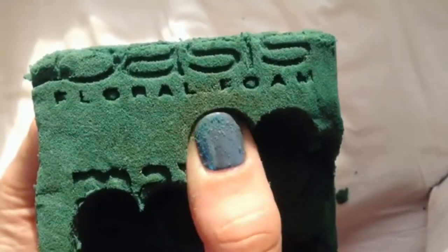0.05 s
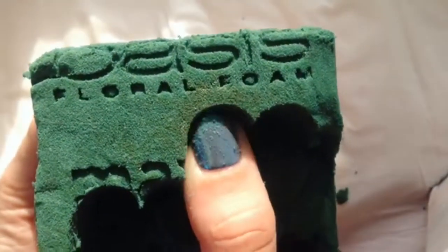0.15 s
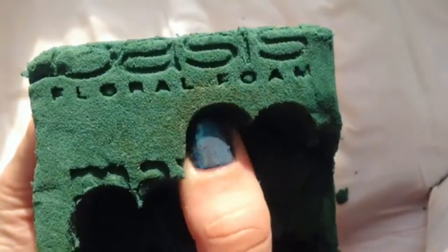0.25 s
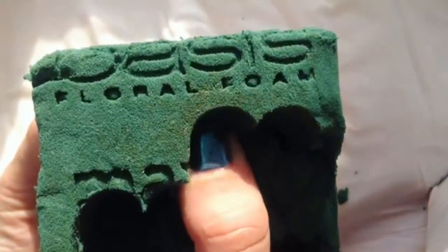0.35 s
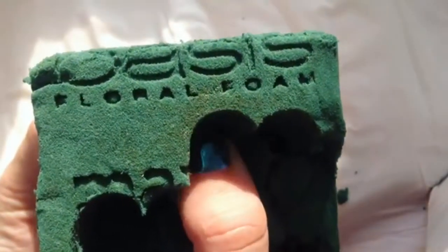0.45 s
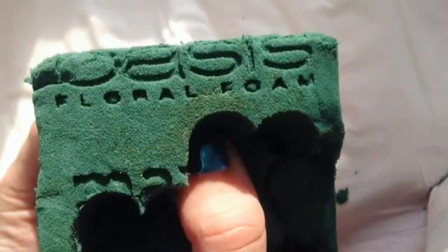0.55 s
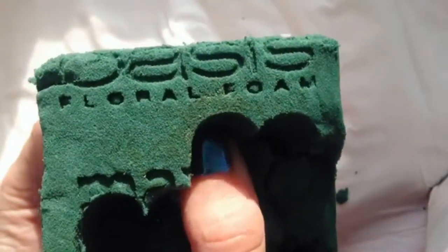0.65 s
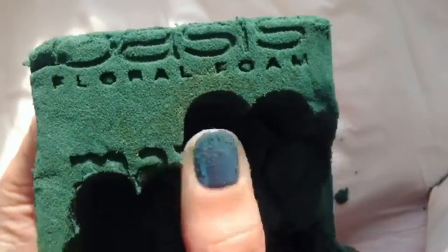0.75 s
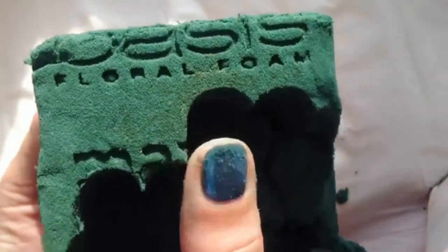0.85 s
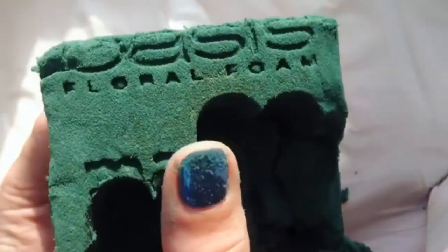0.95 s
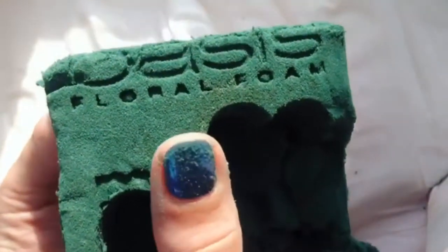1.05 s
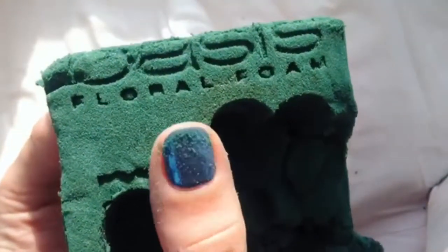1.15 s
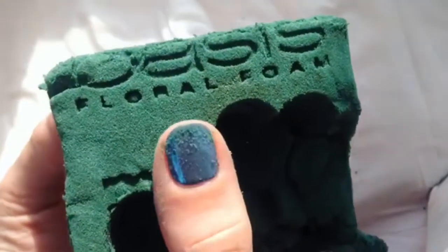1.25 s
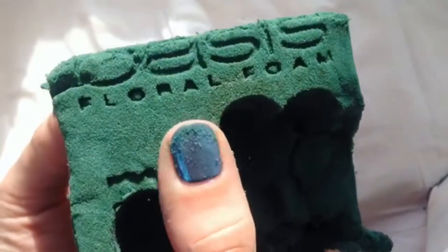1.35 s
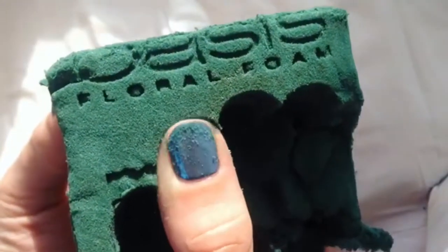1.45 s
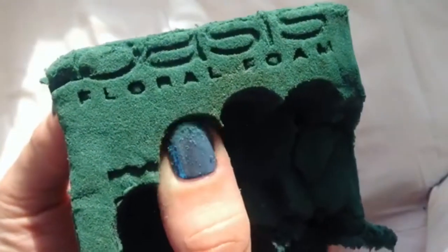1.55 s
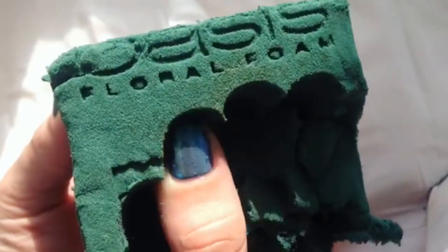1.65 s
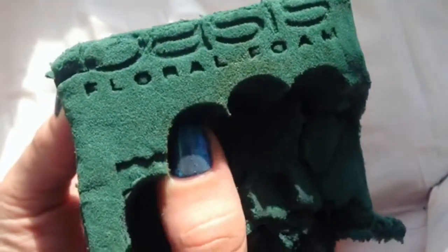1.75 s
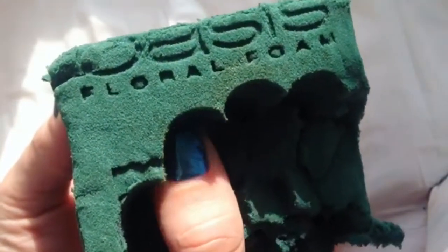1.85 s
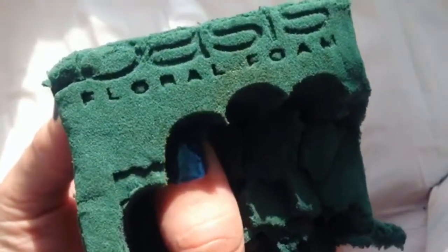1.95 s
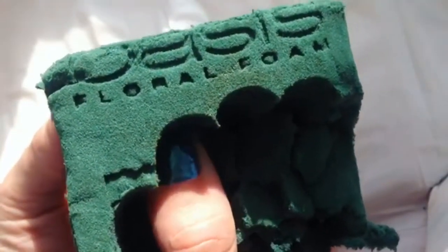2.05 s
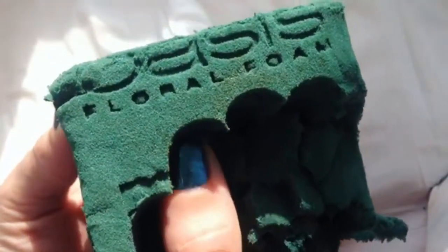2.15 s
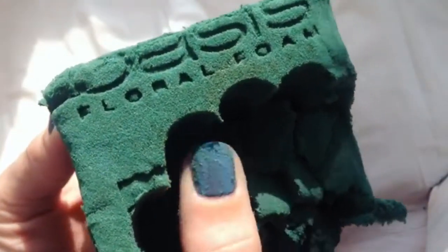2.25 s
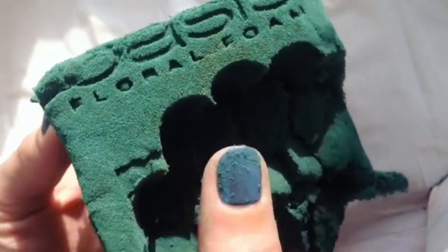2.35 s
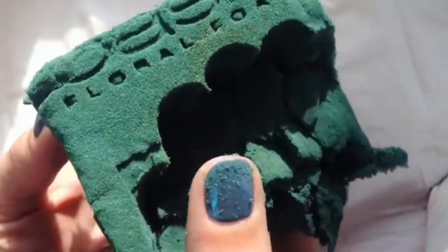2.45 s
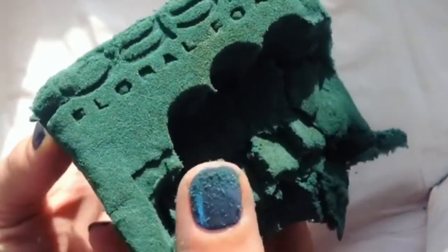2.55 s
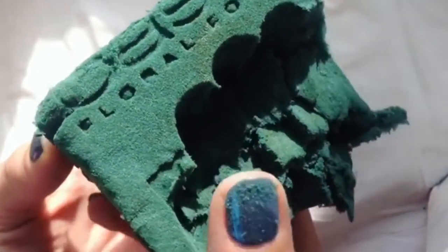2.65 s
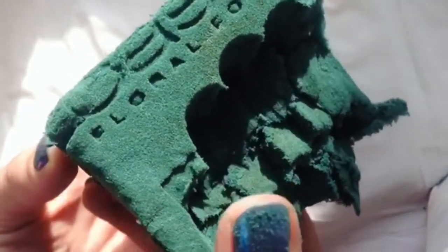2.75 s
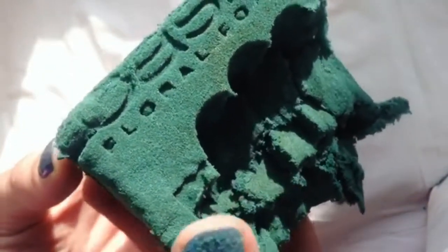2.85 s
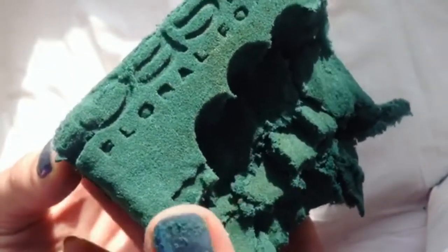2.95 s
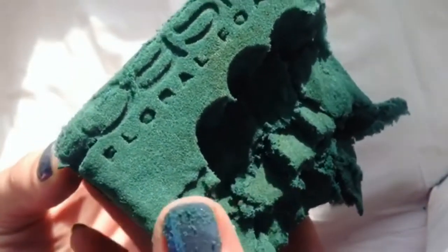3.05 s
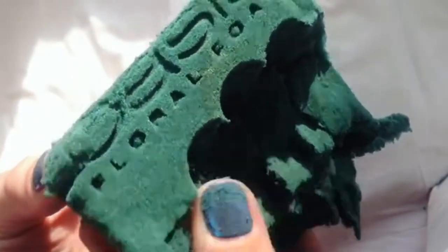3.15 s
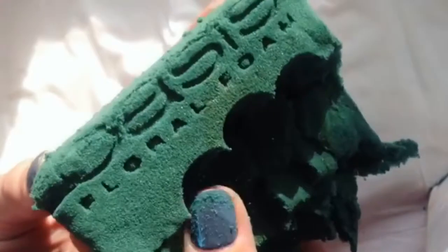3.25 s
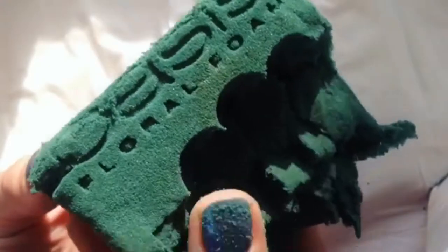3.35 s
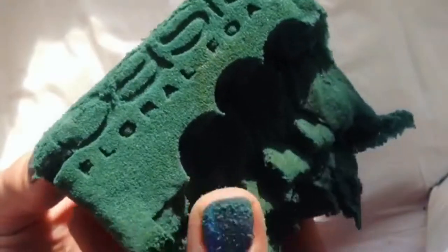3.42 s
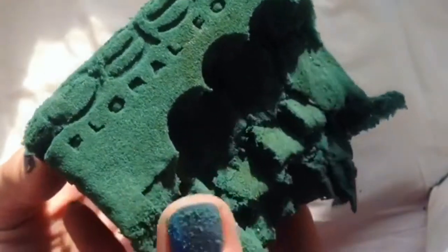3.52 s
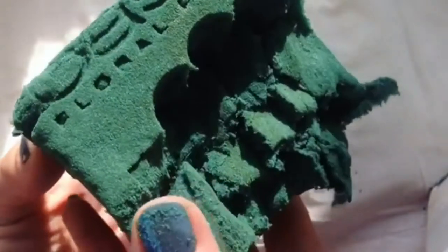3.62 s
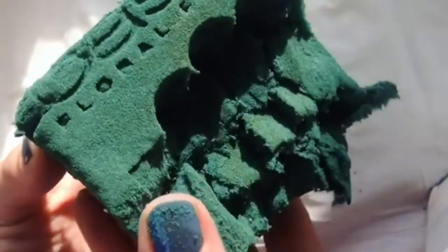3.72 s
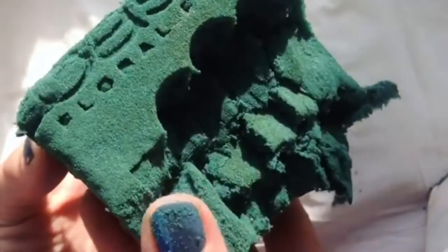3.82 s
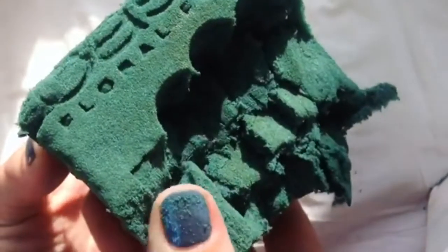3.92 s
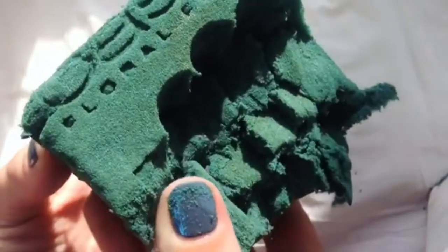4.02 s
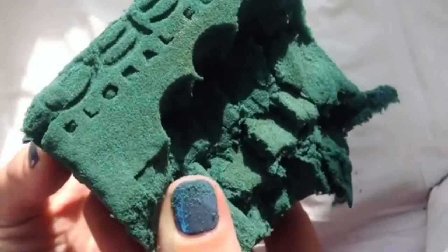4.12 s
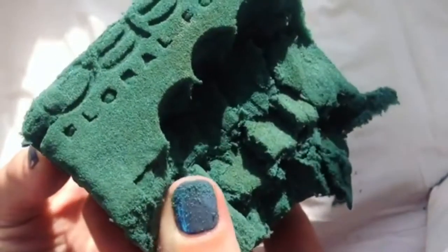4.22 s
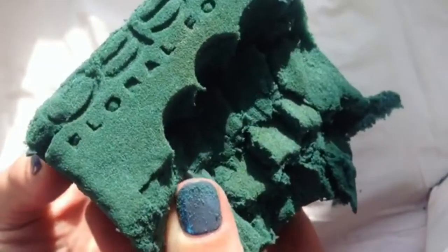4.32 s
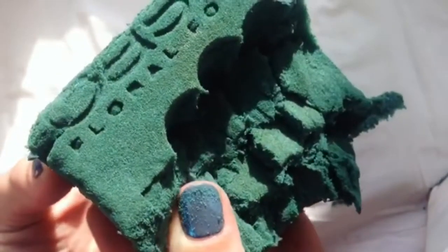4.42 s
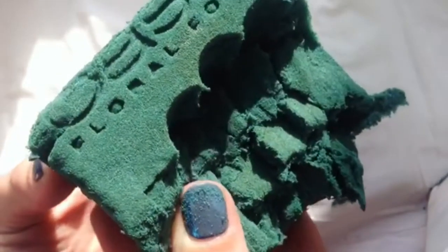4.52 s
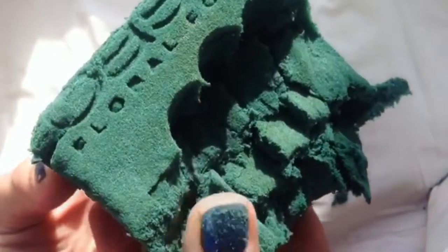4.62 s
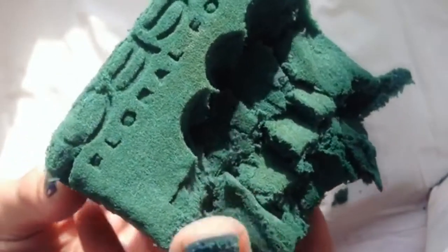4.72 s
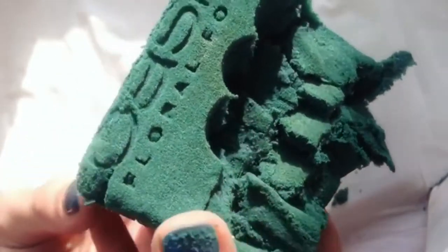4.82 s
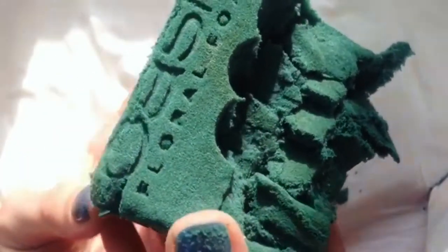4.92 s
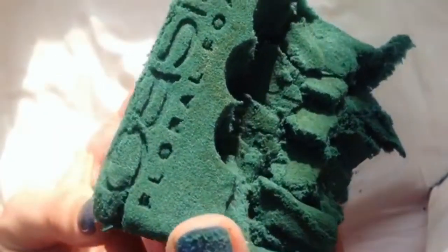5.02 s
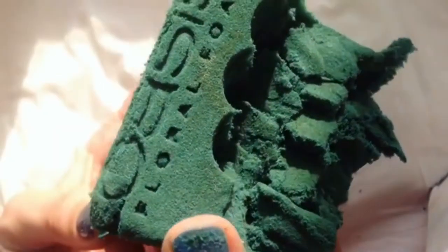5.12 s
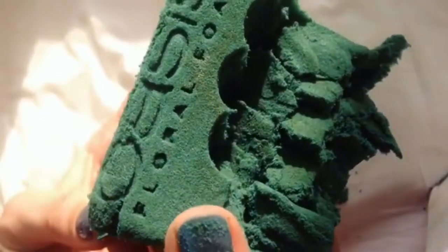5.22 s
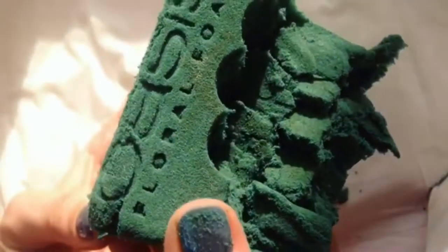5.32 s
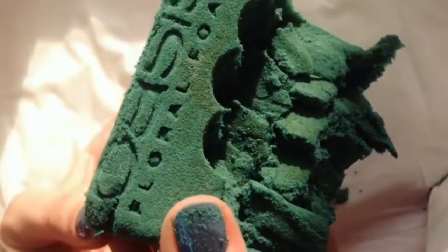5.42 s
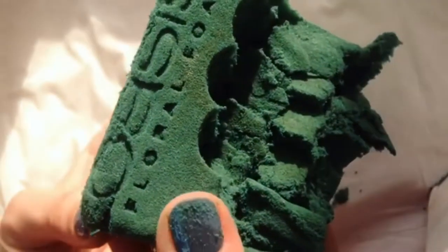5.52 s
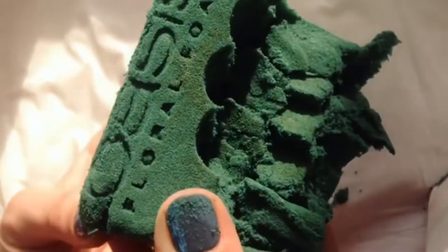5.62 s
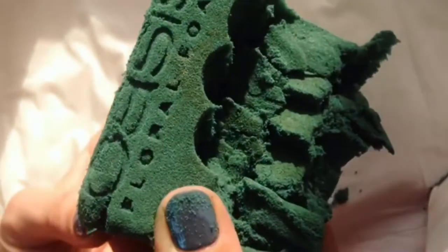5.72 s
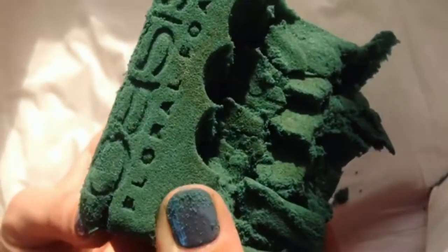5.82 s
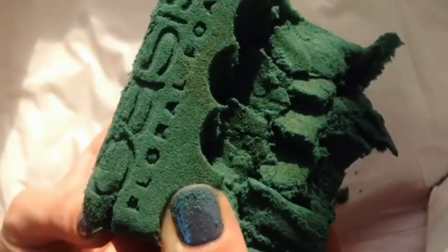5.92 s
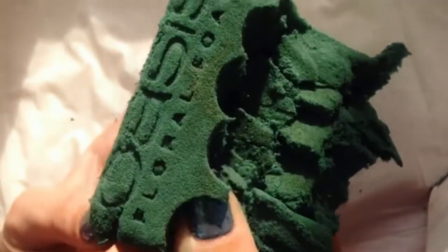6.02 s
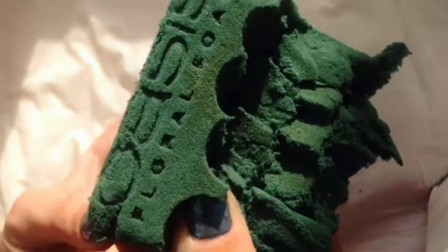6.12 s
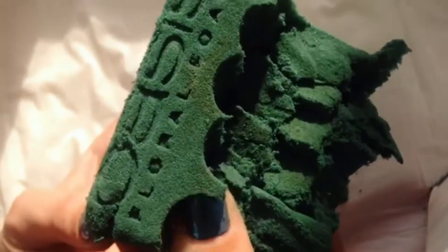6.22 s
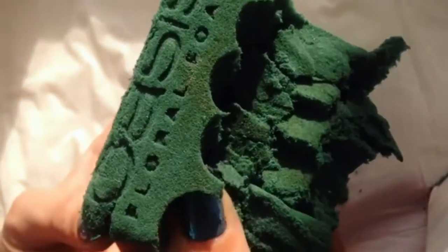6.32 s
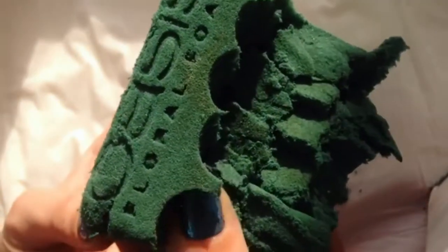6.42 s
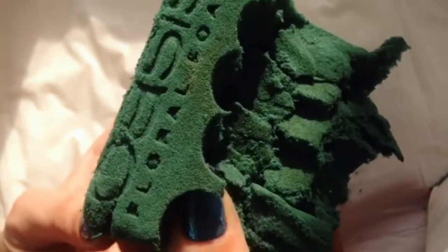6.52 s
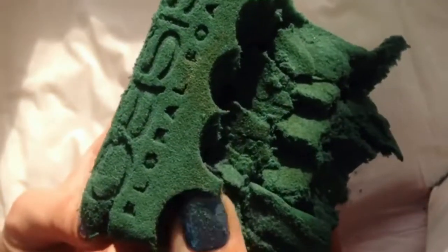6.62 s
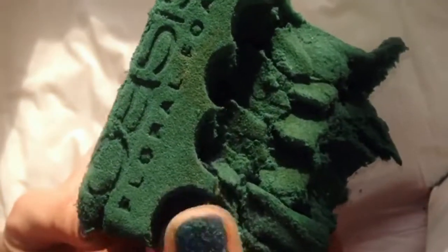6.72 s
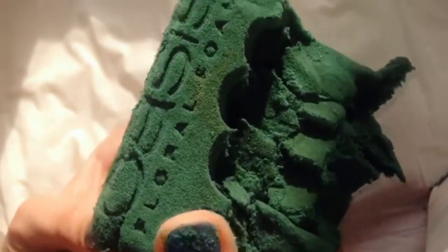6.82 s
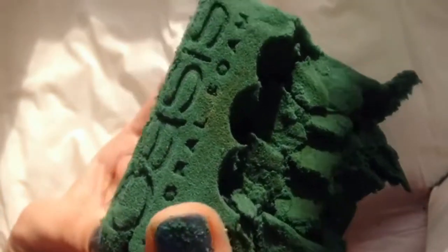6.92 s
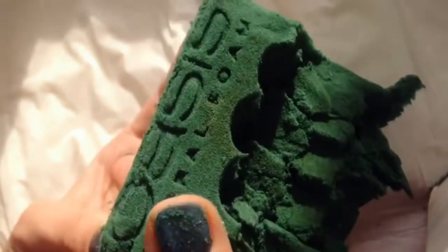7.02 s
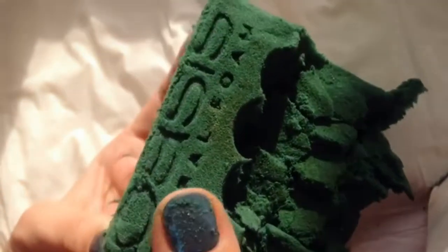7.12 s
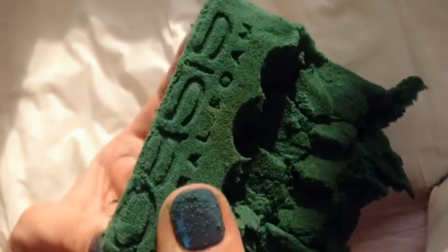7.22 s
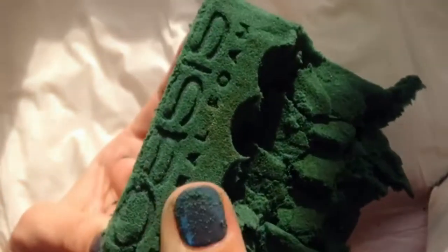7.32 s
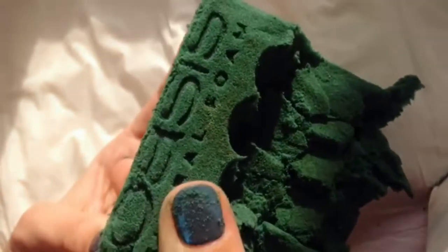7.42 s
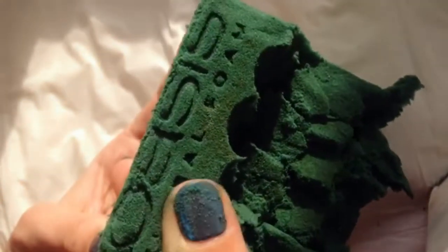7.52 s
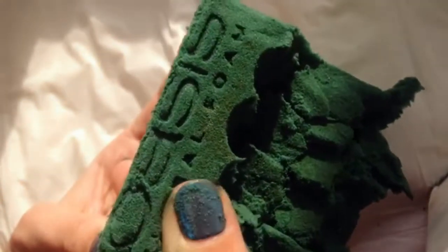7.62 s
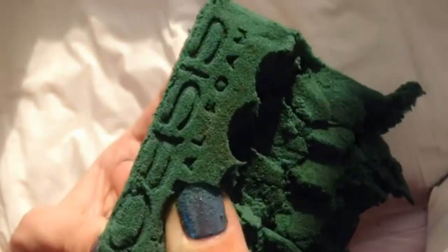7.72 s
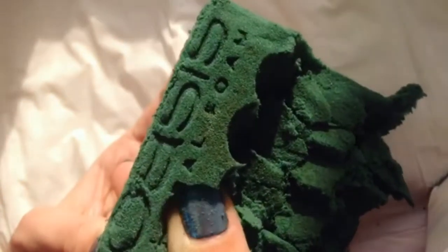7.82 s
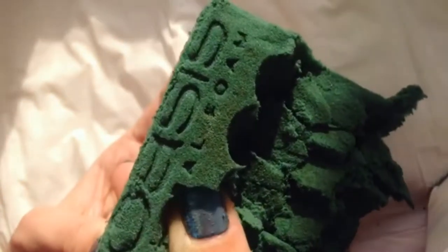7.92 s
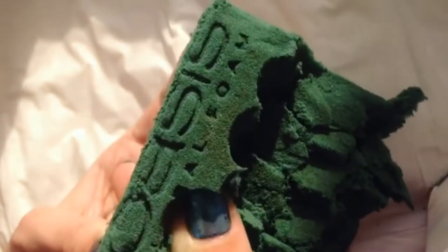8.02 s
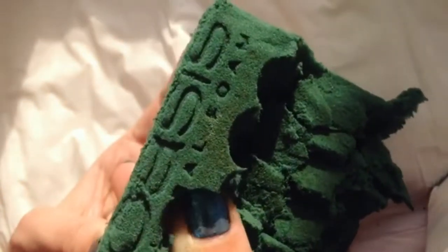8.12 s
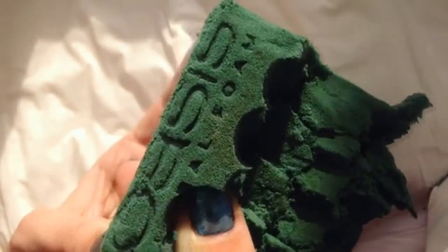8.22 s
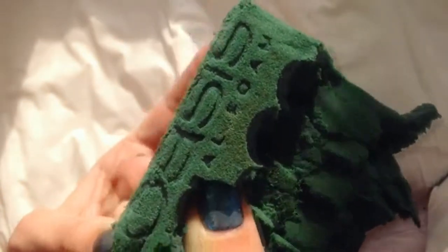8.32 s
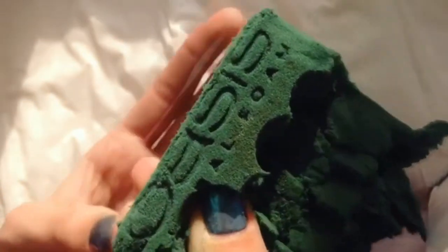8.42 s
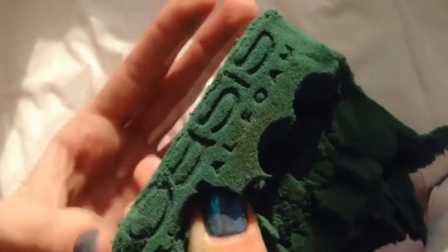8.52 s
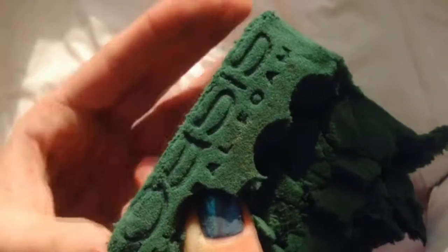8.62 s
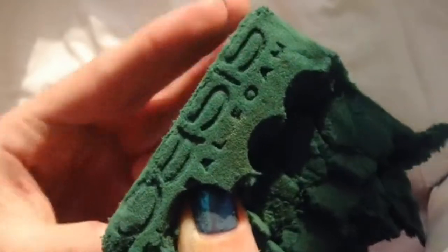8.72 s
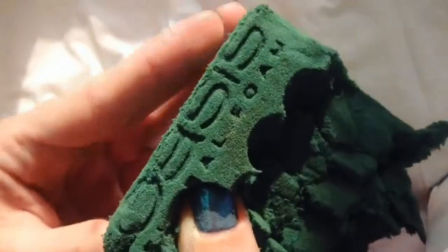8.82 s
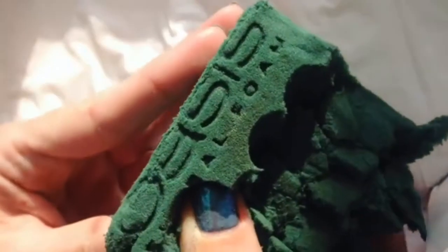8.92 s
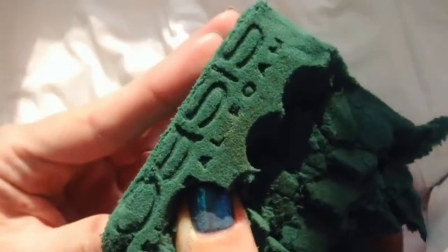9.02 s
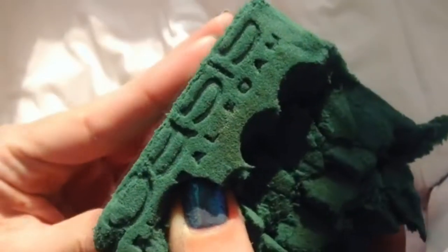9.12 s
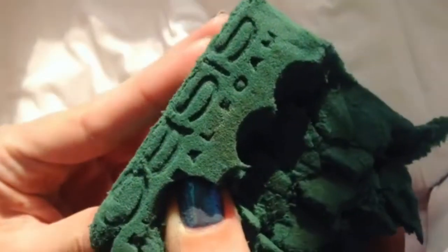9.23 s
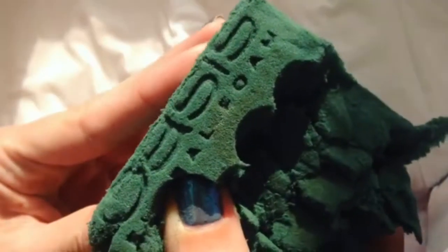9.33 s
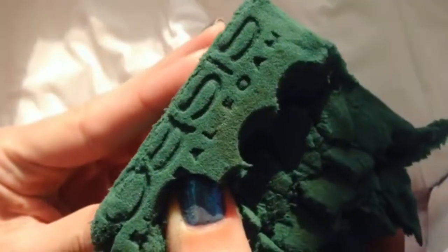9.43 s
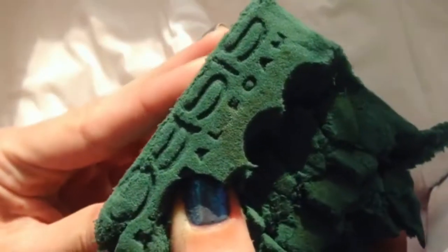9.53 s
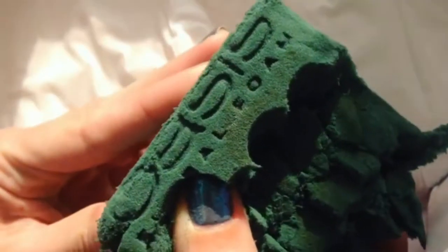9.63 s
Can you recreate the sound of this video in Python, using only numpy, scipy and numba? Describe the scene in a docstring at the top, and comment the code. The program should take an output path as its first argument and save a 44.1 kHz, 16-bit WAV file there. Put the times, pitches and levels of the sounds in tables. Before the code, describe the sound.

A close, dry phone pickup in a quiet room with low rumble, faint hiss and barely audible wavering hum. From 0 to 0.7 s a thumb sinks into brittle foam with a dense, gritty crunch full of tiny snaps. Soft skin brushing follows around 0.9 s, then a second crunch from about 1.4 to 2.15 s. Light rubbing fills the gap until a short, very sharp crack at 3.3 s. A softer crackling press runs from 4.0 to 4.65 s, followed by quiet scraping. From 5.45 to 6.5 s come uneven, brighter crackles with strong hollow snaps, the hardest near 6.17 and 6.47 s. After a near-silent pause, a crisp break at 7.4 s starts scattered crunches until about 8.3 s. Quiet brushing remains, with small faint crackles around 9.4 to 9.65 s.

```python
"""Brittle foam under a thumb

A thumb presses into dry foam held close to a phone in a quiet room. Collapsing cells crackle as patchy
noise bursts through damped modes; larger walls snap as short tears that ring the light block. Skin
brushes the surface between presses, over rumble and hiss of shaped noise and two wavering sine hums."""
import sys
import numpy as np
from scipy import signal
from scipy.fft import rfft, irfft, next_fast_len
from scipy.io import wavfile
from scipy.ndimage import uniform_filter1d
from numba import njit

SR = 44100
rng = np.random.default_rng(int(sys.argv[2]) if len(sys.argv) > 2 else 0)


def int16_out(signal):
    """Quantize to a 16-bit WAV file."""
    q = np.round(np.clip(np.atleast_2d(signal).T, -1, 1) * 32767)
    wavfile.write(sys.argv[1], SR, q.astype(np.int16))


N = 426006

# bright modes shared by crackle and snaps: centre f/Hz, bandwidth/Hz, relative level/dB
FIZZ_MODES = [(7160, 3430, -2), (10070, 2440, -1.5), (11930, 4600, -3)]


def undb(db):
    """Decibel law: the amplitude gain of a level in dB."""
    return 10 ** (np.asarray(db) / 20)


def unit(x):
    """Normalization of mean power: scale to rms 1 along the last axis."""
    return x / np.sqrt(np.mean(x ** 2, axis=-1, keepdims=True))


def curves(table):
    """Linear interpolation: each column after the time becomes one value a sample."""
    s, *columns = np.transpose(table)
    return [np.interp(np.arange(N) / SR, s, column) for column in columns]


def resonance(f, hz, width_hz):
    """Damped oscillator: causal frequency response of one mode, gain 1 at its centre."""
    return 1j * f * width_hz / (hz ** 2 - f ** 2 + 1j * f * width_hz)


def ring(x, modes, order=1):
    """Modal superposition: modes of alternating sign; a higher order darkens the skirts."""
    f = np.fft.rfftfreq(x.shape[-1], 1 / SR)
    response = 0
    for k, (hz, width_hz, db) in enumerate(modes):
        response = response + (-1) ** k * undb(db) * resonance(f, hz, width_hz) ** order
    return irfft(rfft(x) * response, x.shape[-1])


def walk(rate):
    """Slow random modulation: levels held 1 / rate s, smoothed twice, scaled to rms 1."""
    hold = int(SR / rate)
    steps = np.repeat(rng.standard_normal(N // hold + 1), hold)
    return unit(uniform_filter1d(uniform_filter1d(steps, hold), hold)[:N])


def contact():
    """Incoherent sources add in power: crackle, body and fizz levels in dB, and air pocket Hz."""
    # presses, three sustained and one brief sharp crunch, each a contour of the crackle: t/s, level/dB
    presses = [
        [(0.0, -35), (0.036, -45), (0.111, -28), (0.177, -38), (0.336, -32), (0.397, -36), (0.509, -28.5),
         (0.62, -32), (0.682, -42), (0.746, -70)],
        [(1.277, -60), (1.498, -27.5), (1.59, -30), (1.635, -43.5), (1.677, -30), (1.724, -37), (1.859, -30),
         (1.932, -44.5), (1.98, -36), (2.141, -36.5), (2.19, -62)],
        [(3.296, -66), (3.309, -25.5), (3.325, -23.5), (3.34, -18.5), (3.372, -23.5), (3.378, -40.5),
         (3.393, -35.5), (3.4, -50.5)],
        [(3.91, -55), (4.052, -39.5), (4.139, -34), (4.195, -41.5), (4.242, -32.5), (4.309, -40), (4.361, -36),
         (4.4, -38), (4.517, -31.5), (4.56, -40.5), (4.599, -31.5), (4.669, -71)],
    ]
    # colour of each press: body re crackle/dB, fizz re crackle/dB, air pocket f/Hz
    press_colour = [(-10, -8, 2124), (-8.5, -6.5, 2190), (-5.5, -5, 2770), (-9.5, -4.5, 2590)]
    # short touches, from a soft brush of skin to a lump giving way: peak t/s, level/dB, rise/s,
    # fall/s, body re crackle/dB, fizz re crackle/dB, air pocket f/Hz
    short_touches = [(0.902, -35.5, 0.072, 0.051, -13, -10.5, 2040),
                     (1.01, -47, 0.1, 0.09, -22, -7.5, 2050), (1.162, -41.5, 0.046, 0.028, -18, -9, 1720),
                     (1.24, -54.5, .1, 0.081, -26, -14, 1900), (2.337, -36, 0.09, .16, -13.5, -5.5, 2590),
                     (2.54, -47, .3, .1, -11.5, -11, 2500), (2.617, -42, 0.067, 0.074, -12.5, -7, 4150),
                     (2.8, -40, 0.048, 0.2, -15.5, -6, 3200), (2.96, -46, 0.2, 0.1, -10.5, -10, 2840),
                     (3.161, -53, 0.071, 0.79, -13.5, -11, 2580), (3.26, -56.5, .3, 0.28, -9, -1, 2580),
                     (3.41, -47, .05, 0.28, -8.5, -6, 2450), (3.562, -45.5, .25, 0.088, -21, -12, 2360),
                     (3.714, -58.5, 0.1, 0.073, -23, -13, 2490), (3.858, -42, 0.042, 0.057, -11, -6, 2600),
                     (4.763, -44, .11, 0.13, -15.5, -4.5, 2140),
                     (4.982, -42.5, 0.16, 0.092, -17, -12.5, 2580),
                     (5.099, -48, 0.12, 0.079, -12.5, -12, 2110), (5.227, -44, .11, 0.074, -17, -11, 1830),
                     (5.439, -53, 0.31, .1, -10, -7, 2200), (5.482, -37.5, 0.047, .05, -5, 0.5, 2490),
                     (5.55, -45, .1, 0.22, -10, -1, 2470), (5.644, -42.5, 0.31, 0.058, -8.5, -1.5, 2485),
                     (5.767, -34, 0.039, 0.032, -6.5, 1, 2540), (5.888, -43, 0.18, .1, -7, -0.5, 2500),
                     (5.925, -31.5, 0.085, .035, -6.5, -2, 2540),
                     (6.042, -36.5, 0.06, 0.071, -6, -0.5, 2640),
                     (6.176, -19, 0.014, 0.039, -7.5, -6.5, 2800),
                     (6.24, -46.5, 0.13, 0.081, -8, -6.5, 2770), (6.355, -32, 0.038, 0.058, -8, -4, 2930),
                     (6.505, -33.5, 0.15, .04, -10.5, -5, 2524), (6.696, -51, 0.04, 0.29, -19, -4, 1980),
                     (6.863, -50.5, 0.24, 0.03, -11.5, -5.5, 1910),
                     (7.006, -57.5, 0.11, 0.15, -19.5, -13, 2190),
                     (7.152, -54, 0.082, 0.14, -23, -11, 2570), (7.251, -52, 0.058, 0.04, -10, -9, 2700),
                     (7.365, -47.5, 0.079, .1, -6.5, -16, 2780), (7.422, -27, 0.045, 0.04, -7, -3.5, 2600),
                     (7.537, -38.5, .2, .06, -10, -1.5, 2660), (7.72, -34.5, 0.061, 0.088, -2, -2, 3500),
                     (7.859, -31.5, 0.0095, 0.065, -4, 0, 3400), (7.993, -36, 0.027, .085, -9, -3.5, 2800),
                     (8.112, -42, 0.12, 0.094, -12.5, 0, 2550), (8.226, -35.5, .12, 0.074, -14, -3.5, 2520),
                     (8.327, -41.5, 0.13, 0.02, -20.5, -2, 2305),
                     (8.602, -44.5, 0.23, 0.13, -19, -7.5, 2110),
                     (8.808, -45.5, 0.015, 0.014, -20, -1.5, 2190),
                     (8.888, -45.5, .025, 0.087, -20, -13.5, 2260),
                     (8.96, -52.5, .1, 0.1, -17.5, -12, 3000), (9.035, -46.5, .015, 0.26, -7, -7, 3720),
                     (9.12, -35, 0.13, 0.095, -17, -9.5, 4080), (9.303, -41.5, 0.088, 0.094, -18, -8, 2710),
                     (9.442, -40, 0.083, .04, -19.5, -5, 2320), (9.518, -40.5, 0.024, 0.2, -17, -4, 2280),
                     (9.659, -38, 0.15, .1, -19, -6, 2170)]
    # the hand just holds the block: level/dB, body re crackle/dB, fizz re crackle/dB, air pocket f/Hz
    resting_db, *resting_colour = (-63.5, -23, -6, 2302)
    slope_db = 20  # change of level over one rise or fall time
    t = np.arange(0, N / SR + .002, .002)

    touches = []
    for press, colour in zip(presses, press_colour):
        press_db = np.interp(t, *np.transpose(press), left=-120, right=-120)
        touches.append((press_db, *colour))
    for s, db, rise, fall, *colour in short_touches:
        span = np.clip(np.where(t < s, rise, fall), .005, 2)
        touches.append((db - slope_db * np.abs(t - s) / span, *colour))
    touches.append((resting_db + 0 * t, *resting_colour))

    power = undb([touch[0] for touch in touches]) ** 2
    body_db, fizz_db, hz = np.transpose([touch[1:] for touch in touches])
    levels = [10 * np.log10(undb(db) ** 2 @ power) for db in (0 * hz, body_db, fizz_db)]
    # the loudest touch weighs most in the pocket's pitch
    pocket_hz = hz @ power / power.sum(axis=0)
    return curves(np.transpose([t, *levels, pocket_hz]))


@njit
def sweep(x, hz, sharpness):
    """Time-varying resonance: a state-variable band-pass whose centre moves, gain 1 there."""
    y, band, low, damping = np.empty(len(x)), 0., 0., 1 / sharpness
    for i in range(len(x)):
        g = np.tan(np.pi * hz[i] / SR)
        v = (band + g * (x[i] - low)) / (1 + g * (g + damping))
        band = 2 * v - band
        low = low + 2 * g * v
        y[i] = damping * v
    return y


def patchy(x, modes, quick_db, slow_db):
    """Varying modal excitation: breaks drive modes unevenly, and the grip shifts them slowly."""
    size = next_fast_len(N)
    f, spectrum, out = np.fft.rfftfreq(size, 1 / SR), rfft(x, size), 0
    for k, (hz, width_hz, db) in enumerate(modes):
        part = irfft(spectrum * resonance(f, hz, width_hz) ** 2, size)[:N]
        mode_db = db + quick_db * walk(120) + slow_db * walk(10)
        out = out + (-1) ** k * part * undb(mode_db)
    return unit(out)


def cells(crackle_db, body_db, fizz_db, pocket_hz):
    """Random impulsive excitation: bursting cells, with decaying lumps as the thumb digs in."""
    # modes of the body, then of the crackle: centre f/Hz, bandwidth/Hz, relative level/dB
    body_modes = [(449, 324, 1), (797, 400, -2.5), (1172, 720, 5)]
    crackle_modes = [(1722, 730, 1.5), (2353, 1100, 9), (3000, 3500, -0.5), (5650, 2330, 0)]
    digging = np.clip((body_db + 62.5) / 14, 0, 1)

    # about 130 lumps a second, each trailing off with a time constant of 1.1 ms
    starts = (rng.random(N) < 130 / SR) * undb(0.4 * rng.exponential(size=N))
    lumps = signal.lfilter([1], [1, -np.exp(-1 / (0.0011 * SR))], starts)
    grain_db = 1.66 * rng.exponential(size=N) + 2.8 * walk(45)
    grain = rng.standard_normal(N) * undb(grain_db)
    bursts = grain * (1 + (.2 + 1.5 * digging) * lumps)
    # even out the power over 40 ms, so the contact levels set the loudness
    bursts = bursts / np.sqrt(uniform_filter1d(bursts ** 2, SR // 25))

    pocket = unit(sweep(bursts, pocket_hz, 6.6))
    crackle = unit(patchy(bursts, crackle_modes, quick_db=2.2, slow_db=1.1) + .55 * pocket)
    body = patchy(bursts, body_modes, quick_db=3.0, slow_db=0.66)
    fizz = patchy(bursts, FIZZ_MODES, quick_db=-0.04, slow_db=0.03)
    return crackle * undb(crackle_db) + body * undb(body_db) + fizz * undb(fizz_db)


def room():
    """Shaped noise and frequency modulation: low rumble, faint hiss and two wavering hums."""
    # noise spectrum: f/Hz, relative density/dB per Hz
    noise_spectrum = np.array([(25, -30), (45, -2), (90, -4), (130, -6), (210, -4.5), (300, -17),
                               (700, -22.5), (1800, -32), (6000, -23), (14000, -40.5)])
    # levels of the two hums before their swells: t/s, low hum level/dB, upper hum level/dB
    hum_levels = [(0.0, -67, -70), (0.44, -65, -60), (0.81, -72, -74), (1.2, -76, -64.5), (2.02, -59, -68),
                  (2.52, -89.5, -69.5), (4.59, -64, -67), (6.05, -67, -71), (6.62, -65, -67.5),
                  (7.74, -74, -54), (8.0, -81, -51.5), (8.28, -58.5, -62), (9.34, -65, -58),
                  (9.65, -64, -64)]
    noise_db = -62.5
    hum_hz, waver_hz = (59, 160), (1.5, 2.5)  # mean pitch and rms deviation of each hum

    size = next_fast_len(N)
    f = np.fft.rfftfreq(size, 1 / SR)
    table_hz, table_db = noise_spectrum.T
    colour = undb(np.interp(np.log(f + 1), np.log(table_hz), table_db))
    noise = irfft(rfft(rng.standard_normal(size)) * colour, size)[:N]
    out = unit(noise) * undb(noise_db)
    for db, hz, deviation_hz in zip(curves(hum_levels), hum_hz, waver_hz):
        phase = 2 * np.pi * np.cumsum(hz + deviation_hz * walk(11)) / SR
        # the hums come in short swells
        swell = unit(undb(3.2 * walk(15)))
        out = out + np.sqrt(2) * np.sin(phase) * swell * undb(db)
    return out


def snaps(rows, bright_db):
    """Impulsive modal excitation: a tearing burst rings the block, its cavity, a thud and a fizz."""
    # modes of the block, then of the thud: centre f/Hz, bandwidth/Hz, relative level/dB
    block_modes = [(574, 810, -2.5), (1070, 390, 9), (1910, 1060, 4.5), (2220, 2300, -1.5), (3700, 550, -7),
                   (5060, 2700, -3.5)]
    thud_modes = [(153, 130, -12), (422, 280, 6), (827, 610, 6)]
    # louder snaps are darker: fizz re main break at the pivot level, and its change per dB of peak
    pivot_fizz_db, pivot_db, fizz_per_db = -4, -24.5, -0.46
    fizz_follow = 0.91  # share of the crackle's brightness at that moment that a snap takes on
    size, lead = 2048, 384  # samples in one snap, and before its main break

    s, peak_db, hz, thud_db, fall_ms = np.transpose(rows)[:, :, None]
    start = (s * SR).astype(int)
    fizz_db = pivot_fizz_db + fizz_per_db * (np.maximum(peak_db, -35) - pivot_db)
    fizz_db = fizz_db + fizz_follow * bright_db[start]
    ms = (np.arange(size) - lead) * 1000 / SR
    fall_ms = np.clip(fall_ms, .2, 15)
    # a slow tear also builds up slowly
    shape = np.exp(-np.abs(ms) / np.where(ms < 0, 0.12 + 0.38 * fall_ms, fall_ms))

    chance = rng.random((len(s), 3, size))
    # the tear is a run of uneven jolts around one main break; dust hisses out more evenly
    tear = shape * (2 * chance[:, 0] - 1) * undb(-3.0 * np.log(chance[:, 1] + 1e-9))
    tear[:, lead] += 4.0
    dust = shape ** 0.66 * (2 * chance[:, 2] - 1)

    f = np.fft.rfftfreq(size, 1 / SR)
    cavity = irfft(rfft(tear) * resonance(f, hz, 0.18 * hz), size)
    main = unit(unit(ring(tear, block_modes)) + 1.53 * unit(cavity))
    thud = unit(ring(tear, thud_modes, order=2))
    fizz = unit(ring(dust, FIZZ_MODES, order=2))
    sound = main + undb(thud_db) * thud + undb(fizz_db) * fizz

    # the peak level is the highest rms over 130 samples, about 3 ms
    top = np.sqrt(uniform_filter1d(sound ** 2, 130).max(axis=1, keepdims=True))
    out = np.zeros(N + 2 * size)
    np.add.at(out, start + np.arange(size), sound / top * undb(peak_db))
    return out[lead:lead + N]


def small_snaps(body_db):
    """Random point process: lesser snaps fade out unless the thumb digs in; rows suit snaps()."""
    count, low_hz, high_hz = 300, 1064, 3460
    over_body_db, mean_extra_db = 8, 2.5  # least level over the body, and mean random excess
    mean_thud_db, mean_fall_ms = -12, 2
    dig_threshold_db, top_db = -54, -24  # body level below which they fade; their loudest level

    when, size, pitch, thud, fall = rng.random((count, 5)).T
    dig_db = body_db[(when * N).astype(int)]
    fade_db = 3 * np.minimum(dig_db - dig_threshold_db, 0)
    peak_db = dig_db + fade_db + over_body_db - mean_extra_db * np.log(1 - size)
    hz = low_hz * (high_hz / low_hz) ** pitch
    return np.transpose([when * N / SR, np.minimum(peak_db, top_db), hz,
                         2 * thud * mean_thud_db, mean_fall_ms * (.5 + fall)])


def scene():
    """Linear superposition: crackling cells and snapping walls over the room."""
    # the clearest snapping walls: t/s, peak level/dB, cavity f/Hz, thud re main break/dB, fall/ms
    clear_snaps = [(0.005, -24.5, 2460, -5, 1.4), (0.058, -14, 2090, -11, 2.1),
                   (0.096, -20, 1730, -3.5, 1.1), (0.106, -20.5, 850, -9, 0.43),
                   (0.136, -24.5, 1540, -6, 0.83), (0.155, -24, 1800, -4.5, 1.6),
                   (0.202, -25.5, 2330, -10, 4.7), (0.222, -32, 2280, -19, 4.8),
                   (0.242, -27, 1770, -6.5, 2.1), (0.262, -31, 4270, -22, 1.3), (0.281, -28, 925, -22, 2.4),
                   (0.334, -20.5, 2130, -34, 4.5), (0.359, -32, 1000, -30, 7.4),
                   (0.429, -30, 1830, -32, 4.8), (0.47, -27, 2000, -7, 1.4), (0.5, -28, 990, -22, 2.5),
                   (0.552, -26, 1000, -30, 1.6), (0.576, -29, 2170, -6, 1), (0.597, -25, 1870, -29, 1.7),
                   (0.622, -25.5, 1830, -30, 2.7), (0.642, -30, 1190, -30, 3.4),
                   (1.388, -35.5, 3360, -4, 1.1), (1.403, -32, 2170, -3, 2.2), (1.435, -32, 2150, -30, .87),
                   (1.457, -22, 2080, -1.5, 1.4), (1.48, -17.5, 1010, -6.5, 2.6),
                   (1.487, -22.5, 930, 1, 1.3), (1.504, -20, 2130, 2, 1.1), (1.533, -22, 2140, 1, 1.4),
                   (1.553, -23, 2080, -13, 1.3), (1.579, -30, 2110, -30, 2), (1.663, -20.5, 1020, -18, 4),
                   (1.68, -26.5, 1000, -30, .9), (1.7, -24.5, 2170, -2.5, 4.5), (1.734, -33, 710, -7, 3.6),
                   (1.75, -28.5, 2220, -2.5, 2.6), (1.827, -28, 2130, -6, 4.8),
                   (1.844, -32.5, 1020, -32, 3.7), (1.996, -33.5, 1230, -14, 2.6),
                   (2.024, -35.5, 2990, -2, 2.3), (2.096, -28.5, 1240, -33, 3.8),
                   (2.116, -27.5, 1140, -35, 2.4), (2.137, -29.5, 1750, -17, 2.2),
                   (2.79, -44.5, 3370, -6.5, 5.9), (2.811, -39, 1930, -34, 1.3),
                   (3.249, -42, 1440, -10, 0.93), (3.284, -36, 1410, -20, 2), (3.299, -27, 1010, -24, 0.99),
                   (3.309, -10, 2540, -23, 1.5), (3.325, -16.5, 2500, -20, 1.4),
                   (3.332, -17.5, 2600, -23, 0.84), (3.338, -20, 1050, -30, 0.91),
                   (3.368, -16.5, 1920, -16, 6.7), (4.047, -22, 2380, -4.5, 1.2),
                   (4.122, -29.5, 2540, -30, 3.4), (4.239, -22, 2450, -11.5, 2.2),
                   (4.313, -29, 1790, -24, 1.1), (4.35, -24, 1830, -12, 1.2), (4.379, -25, 2390, -23, 2.6),
                   (4.406, -26.5, 2390, -27, 1.0), (4.441, -24, 2380, -19, 0.79),
                   (4.476, -25.5, 2450, -17, 6.2), (4.51, -27, 2520, -30, 1), (4.524, -26, 2500, -13, 3.1),
                   (4.577, -31.5, 1980, -26, 2), (4.601, -35, 2660, -25, 2.6),
                   (4.982, -39.5, 1700, -28, 5.1), (5.453, -40, 1100, -13, 0.54),
                   (5.474, -17, 2450, -3, 1.1), (5.527, -25, 2530, -10, 2.6), (5.594, -32.5, 2410, -3, 1.0),
                   (5.614, -34.5, 2500, -13, 1.8), (5.646, -26, 2350, -8, 4),
                   (5.724, -24.5, 1080, -11, 6.1), (5.767, -24, 1130, -7, 1.9),
                   (5.81, -22.5, 1050, -12, 3.8), (5.845, -20.5, 1030, -11, 1.6),
                   (5.855, -26, 2520, -30, .77), (5.876, -17.5, 2400, -7.5, 2.2),
                   (5.888, -19, 2450, -7, 2.4), (5.91, -28.5, 2420, -1, 2), (5.928, -22.5, 2520, -6, 1.2),
                   (5.971, -27.5, 1050, -31, 3.6), (6.021, -23, 2500, -8.5, 4.4),
                   (6.046, -14, 1114, -13.5, 4.2), (6.162, -23, 1160, -26, 4.8),
                   (6.17, -8, 1084, -41, 0.99), (6.196, -30, 2480, -28, 2), (6.342, -32, 2730, -23, .88),
                   (6.357, -23.5, 2980, -23, 0.68), (6.438, -36, 1980, -23, 2),
                   (6.466, -10, 1910, -16, 1.27), (6.785, -41, 1770, -12, 2.3),
                   (7.329, -39.5, 2440, -4, 1.6), (7.354, -37.5, 2620, -5, 2.1),
                   (7.391, -11.5, 2490, -7, 1.7), (7.418, -15, 1090, -16, 0.84),
                   (7.439, -25.5, 2520, -32, 2.9), (7.482, -32.5, 1030, -23, 4.5),
                   (7.516, -26.5, 2080, -11, 3.4), (7.658, -35.5, 4160, -30, 4), (7.696, -29, 2050, -30, 2),
                   (7.711, -28, 3010, -32, 4.1), (7.733, -29.5, 1050, -23, 4.3),
                   (7.77, -17.5, 1050, -13, .62), (7.778, -33, 1360, -16, 2.5),
                   (7.854, -21.5, 4600, -5, 3.8), (7.984, -30.5, 1000, -26, 3.8),
                   (8.021, -36, 1100, -15, 5.3), (8.073, -37, 2560, -9, 2.6), (9.419, -36, 3150, -6, 2.3),
                   (9.452, -36.5, 2780, -16, 4.4), (9.497, -31.5, 2480, -7, 2.2),
                   (9.522, -34, 3730, -31, 1.6), (9.565, -39, 4640, -25, 2.2),
                   (9.592, -31.5, 2190, -24, 1.5), (9.619, -35, 2990, -20, 1.8),
                   (9.634, -34, 2100, -14, 2.3)]
    crackle_db, body_db, fizz_db, pocket_hz = contact()
    all_snaps = np.vstack([clear_snaps, small_snaps(body_db)])
    breaks = snaps(all_snaps, fizz_db - crackle_db)
    return (cells(crackle_db, body_db, fizz_db, pocket_hz) + breaks + room())[None]


def record(dry):
    """Saturation and band limiting: peaks are rounded; treble is lower above 13.9 kHz, absent above 15.9 kHz."""
    shelf_hz, shelf_db, top_hz = 13900, 13, 15900
    shelf = signal.ellip(6, .2, shelf_db, shelf_hz, fs=SR, output="sos")
    top = signal.ellip(12, .2, 100, top_hz, fs=SR, output="sos")
    rounded = dry / (1 + (np.abs(dry) / .82) ** 6) ** (1 / 6)
    return signal.sosfilt(top, signal.sosfilt(shelf, rounded))


dry = scene()
out = record(dry)
int16_out(out)
```